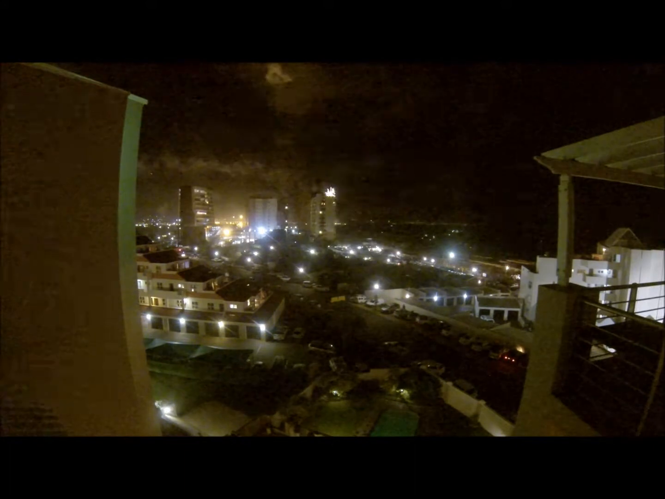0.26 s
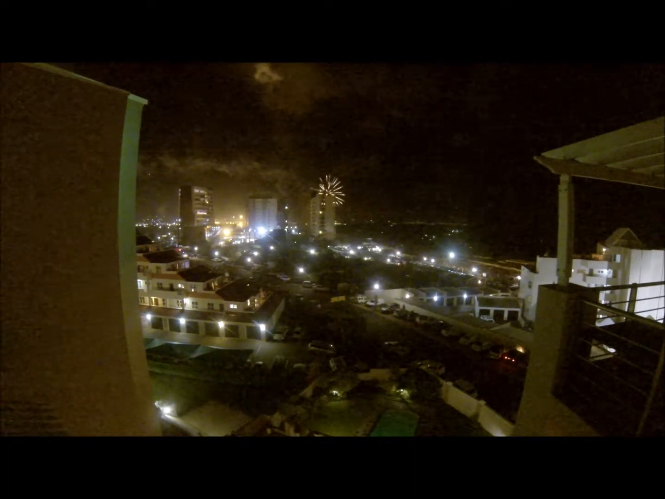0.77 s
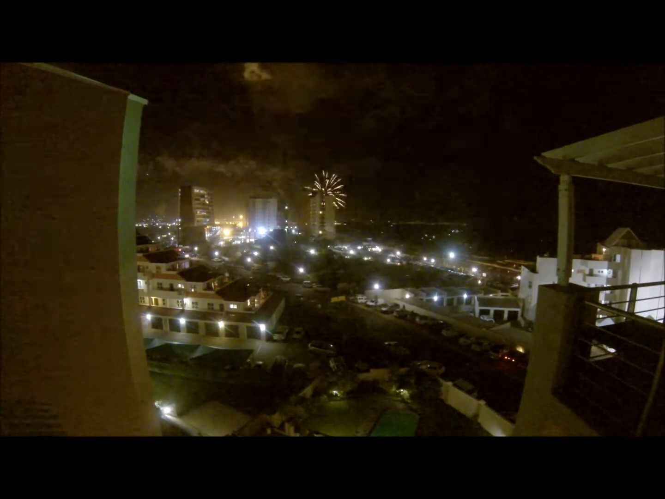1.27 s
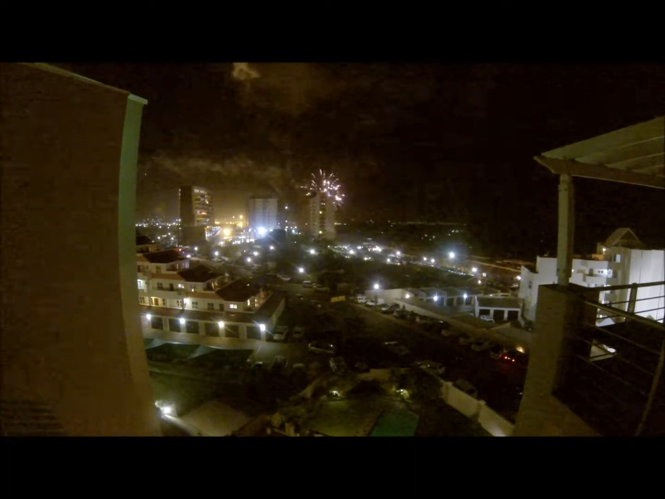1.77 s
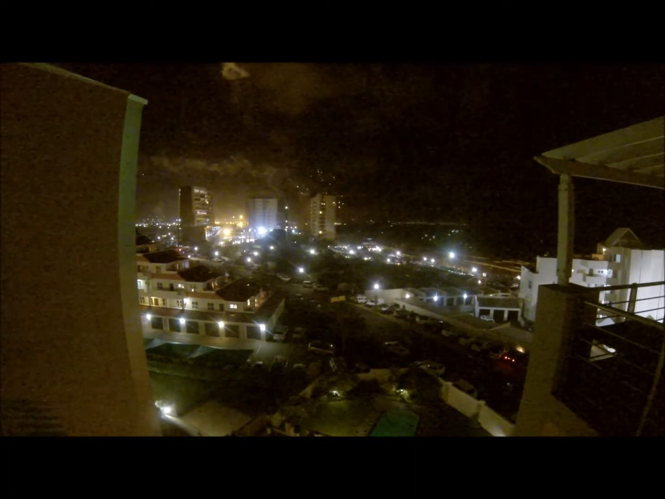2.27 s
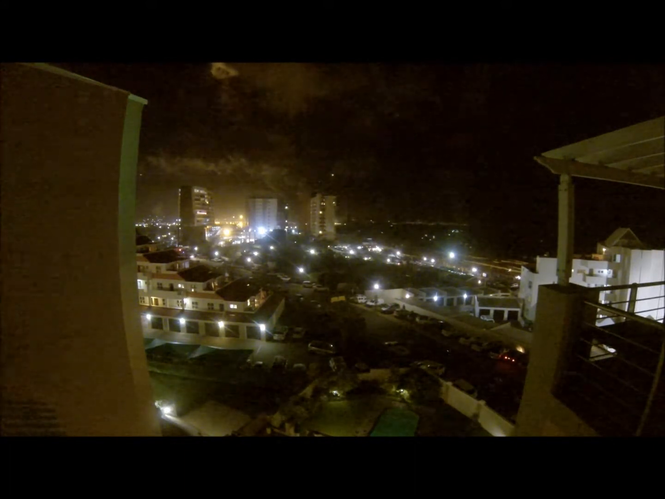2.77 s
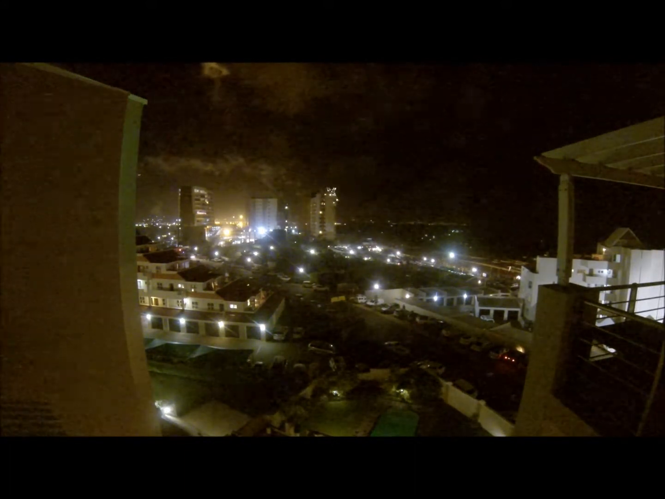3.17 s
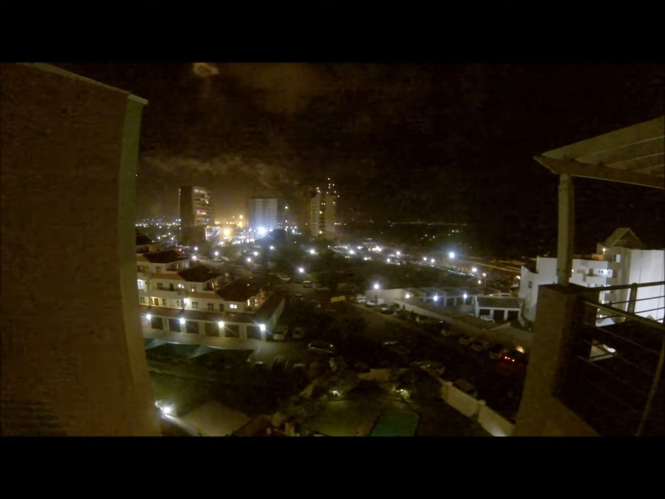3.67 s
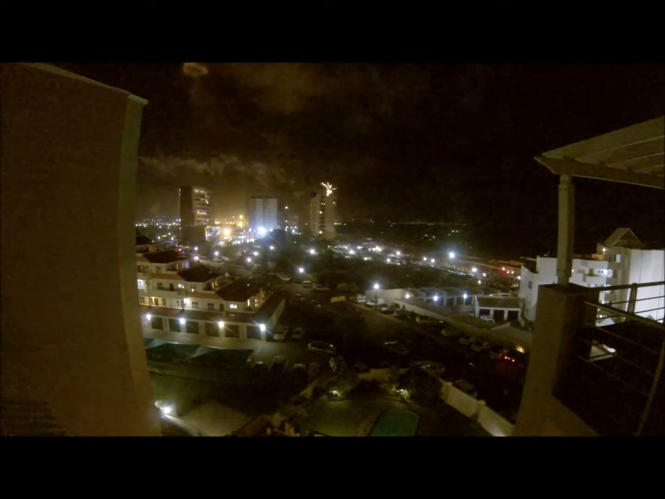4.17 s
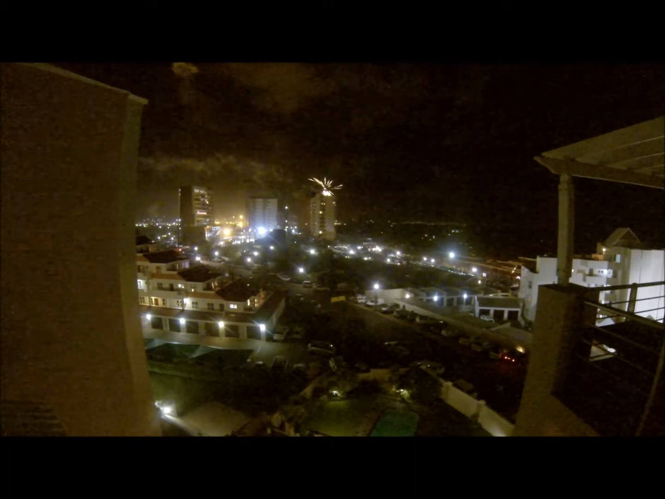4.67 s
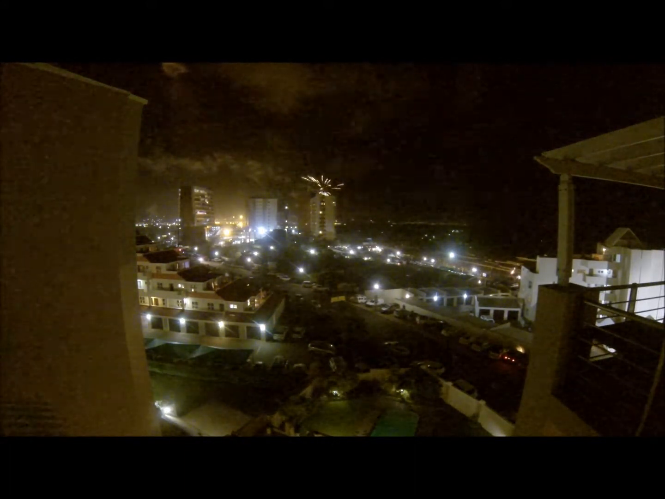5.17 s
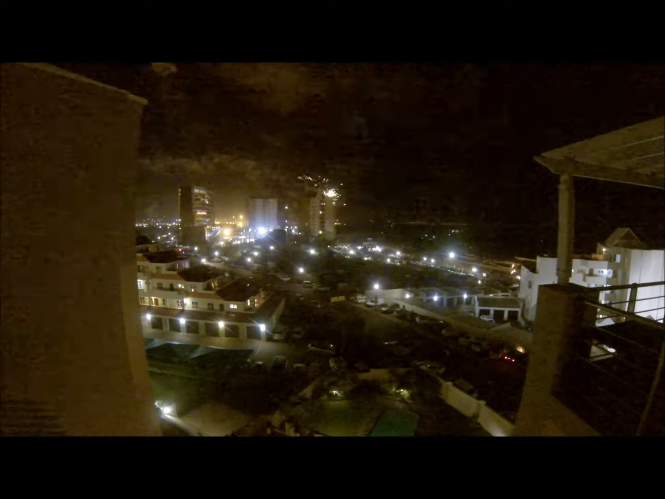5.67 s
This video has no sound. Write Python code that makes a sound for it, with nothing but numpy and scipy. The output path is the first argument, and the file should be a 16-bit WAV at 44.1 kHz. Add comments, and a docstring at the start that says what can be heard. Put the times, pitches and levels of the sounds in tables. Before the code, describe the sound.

The sound opens on a distant firework burst already dying away: low thuds in the first third of a second, an echo swell around 0.15 s, bass fading before the treble. A deep, unevenly throbbing rumble and muffled town rush run throughout, coloured by the hollow air of a high balcony. A faint pop at about 1.15 s precedes a strong sharp crack at 1.27 s; others follow at 2.4, 4.0 and 5.0 s, the last boomier and duller. Each crack scatters off the balcony walls, slaps back from a large building about 0.16 s later, then rolls over roofs with a soft late return. Another tiny pop comes near 1.9 s. Faint thin whistles slide mostly upward from 3.3 to 4.5 s and more clearly from 5.2 s to the end, around 1.1 and 1.8 kHz. The microphone sounds small and boxy, with faint hiss and whine.

```python
"""A shell burst dies away over a town at night, its bass sooner than its treble, with low thuds off the town.
A low rumble throbs beneath, over noise for the town's rush. Four more far fireworks crack from 1.27 s on:
sharp clicks and smeared noise off the walls of a high balcony, whose air rings in decaying modes. Each returns
from a large building and rolls over the roofs as fading noise. Far whistles, sliding tones, come between and
after the later ones. All passes through a small resonant case, with faint electronic hiss and whine on top."""
import sys
import numpy as np
from scipy import signal
from scipy.fft import rfft, irfft, next_fast_len
from scipy.io import wavfile
from scipy.ndimage import uniform_filter1d

SR = 44100
rng = np.random.default_rng(int(sys.argv[2]) if len(sys.argv) > 2 else 0)


def int16_out(signal):
    """Quantize to a 16-bit WAV file."""
    q = np.round(np.clip(np.atleast_2d(signal).T, -1, 1) * 32767)
    wavfile.write(sys.argv[1], SR, q.astype(np.int16))


N = 261513
T = np.arange(N) / SR

# Levels in the tables and settings are relative: later filters and gains still act on them.

# level of the deep rumble: (time [s], level [dB])
RUMBLE_LEVEL = [(0, -25), (.23, -35.5), (.41, -22.5), (.6, -30.5), (.8, -27.5), (1.2, -26), (1.43, -40),
                (1.5, -30), (1.78, -34), (1.88, -49.5), (2.02, -32.5), (2.21, -30), (2.36, -55),
                (2.43, -28.5), (2.67, -30), (2.79, -47), (2.88, -35), (2.94, -40.5), (3.01, -33.5),
                (3.21, -48), (3.39, -28), (3.54, -44.5), (3.62, -35.5), (3.72, -48), (3.85, -29),
                (3.93, -42), (4.11, -22.5), (4.3, -34.5), (4.53, -23.5), (4.76, -29.5), (5.08, -29),
                (5.2, -39.5), (5.33, -29.5), (5.6, -40), (5.93, -35.5)]
# levels of the town's low noise and of its rush: (time [s], low level [dB], rush level [dB])
TOWN_LEVEL = [(0, 8, 1), (.7, -1, 2), (1.15, 0.5, 5), (1.6, 2.5, -0.5), (2.05, -2, 1.5), (2.36, 0.5, -1.5),
              (2.9, 1, 1), (3.4, -2, 0.5), (3.85, -1.5, 0.5), (4.5, -0.5, 4), (4.87, -2, 0.5),
              (5.4, -0.5, 2.5), (5.93, 0.5, 4)]
# spectrum of the town's noise: (frequency [Hz], level [dB])
TOWN_SPECTRUM = [(20, -50.5), (60, -17.5), (95, -25), (125, -30.5), (200, -30.5), (280, -37.5),
                 (480, -42.5), (640, -50), (900, -57.5), (1700, -55.5), (2300, -64.5), (3000, -68.5),
                 (3550, -73), (6000, -90.5)]
# where the balcony lifts the town's noise: (frequency [Hz], width [Hz], gain [dB])
TOWN_RESONANCES = [(92.7, 12, 7.5), (153.9, 21.6, 16), (222, 20, 3)]
# soft swells in the balcony's air modes: (middle [s], length [s], frequency [Hz], level [dB])
SWELLS = [(0.374, 0.17, 93.8, -47), (.68, 0.11, 92, -41.5), (0.853, 0.11, 205, -44),
          (1.105, 0.23, 228, -44), (1.207, 0.12, 93, -40), (1.657, 0.1, 87.8, -51), (2, 0.14, 90, -45),
          (2.02, 0.19, 212, -51), (3.13, 0.88, 157.9, -50), (3.348, 0.2, 208, -54),
          (3.625, 0.23, 157.4, -46.5), (3.867, 0.087, 210, -45), (4.49, 0.13, 226, -48.5),
          (4.84, 0.14, 221, -44), (5.683, 0.87, 91.76, -46), (5.745, 0.2, 205, -49)]
# the deepest air mode sits a little higher when driven harder
RUMBLE_HZ, RUMBLE_HZ_PER_DB, RUMBLE_WANDER_HZ = 47.7, 0.19, 3
RUMBLE_WANDER_DB_PER_DB = 0.551  # the pitch wanders more as the rumble sinks
RUMBLE_DB, THROB_DB, THROBS_PER_S = -0.84, 1.27, 25
TOWN_SHARE = 0.51  # share of the rumble's swell that the town's low noise follows
SWELL_STEPS_PER_S = 22  # faster steps make a wider band

# far whistles; a negative slide falls: (start [s], length [s], held pitch [Hz], upward slide [Hz], level [dB])
WHISTLES = [(3.334, 0.28, 1120, 40.5, -74), (3.569, 0.19, 1150, 61, -70), (3.705, 0.15, 1110, 1.5, -70.5),
            (3.919, 0.15, 1125, 27, -67), (4.178, 0.17, 1102, -0.5, -64), (4.235, 0.25, 1793, -10, -69.5),
            (5.179, 0.22, 1128, 115, -62), (5.334, 0.21, 1120, 28.5, -62), (5.485, 0.27, 1153, 24.5, -64.5),
            (5.678, 0.33, 1144, 9.5, -66), (5.25, 0.14, 1800, -36, -65), (5.598, 0.18, 1880, 29.5, -68.5),
            (5.77, 0.096, 1830, -38, -61), (5.848, 0.14, 1805, -83, -64.5), (4.764, 0.32, 3490, 152.5, -83)]
WHISTLE_SLIDE_S, WHISTLE_ATTACK_S, WHISTLE_RELEASE_S = 0.11, 0.022, 0.11
WHISTLE_SCATTER, WHISTLE_SCATTER_STEPS_PER_S = 0.4, 45  # scattered copies, as a share of the tone
WHISTLE_WAVER, WHISTLE_FLUTTER_DB = .007, 1.6  # waver as a share of the pitch

# spectrum of the earlier shell: (frequency [Hz], level [dB])
EARLIER_SPECTRUM = [(30, -5), (90, -11.5), (165, -8), (240, -5), (340, -25.5), (490, -22), (750, -42),
                    (1100, -37.5), (1900, -40), (2700, -51), (3700, -59), (7000, -71), (12000, -89)]
# its low thuds: (time [s], frequency [Hz], level [dB], t60 [s])
THUDS = [(0, 168, 2.5, 0.028), (.029, 179, -6.5, 0.058), (0.065, 201, -14, .06), (.086, 148, -16.5, 0.18),
         (.166, 173, -14, 0.1), (.244, 164.5, -20, .2), (.32, 165.4, -25, 0.18)]
EARLIER_BASS_DB, EARLIER_BASS_T60_S = 0, 0.73
EARLIER_TREBLE_DB, EARLIER_TREBLE_T60_S = 1, 2.24
EARLIER_ROLL_DB, EARLIER_ROLL_T60_S = -15.5, 7.6
EARLIER_ECHO_S, EARLIER_ECHO_DB, EARLIER_ECHO_T60_S = 0.144, -2, 0.56

# shells: (arrival [s], boom [dB], crack [dB], treble edge [dB], rolling tail's treble [dB], echo's treble [dB])
BURSTS = [(1.269, 1.5, 4.5, 1, 4, -2), (2.4099, -0.5, 1.5, -2.5, 2, -5), (4.0080, 0, 1, 0, 0.5, -3),
          (5.0255, 2, -6, -15, 1, -10)]
# faint small pops: (time [s], level [dB], t60 [s])
POPS = [(1.159, -9, 0.28), (1.882, -11.5, 0.065)]
# spectrum of the rolling scatter: (frequency [Hz], level [dB])
ROLL_SPECTRUM = [(40, -22), (160, -18), (260, -17.5), (480, -20), (680, -34), (850, -41.5), (1100, -32.5),
                 (1400, -33.5), (2100, -40), (2700, -44.5), (3200, -53), (3650, -53.5), (5000, -67.5),
                 (9000, -84.5)]
# a soft, drawn-out return from the far side of town
FAR_LAG_S, FAR_RISE_S, FAR_T60_S, FAR_LOW_DB, FAR_HIGH_DB = 0.434, 0.091, 0.88, -21, -22.5

# facades that return each shock: (lag [s], depth in time [s], level [dB])
FACADES = [(0.042, .062, -2), (0.160, 0.0159, -1.5), (0.206, .02, -9)]
# low-mid thump of the largest facade's return: (frequency [Hz], level [dB], t60 [s])
THUMP = [(342, -41, 0.22), (302, -42, 0.072)]
# spectrum of the building's echo: (frequency [Hz], level [dB])
ECHO_SPECTRUM = [(60, -15.5), (200, -9), (350, -10.5), (500, -23), (760, -35), (1100, -24.5), (2000, -29),
                 (2900, -41), (4000, -47.5), (6000, -65.5), (12000, -102.5)]
THUMP_LAG_S = .163
SLAP_LAG_S, SLAP_DB, SLAP_LOSS_DB_PER_S = .163, 20, 301  # the hard knock off the flat front
WAKE_LAG_S, WAKE_DB, WAKE_T60_S = 0.1624, -10, 0.38

# paths by floor, walls and roof of the balcony: (delay [s], level [dB])
WALLS = [(.0002, -8.5), (.0036, -5.5), (.0079, -8.4), (0.0131, -5), (0.0254, -11.5), (.0444, -13)]
# air modes of the balcony: (frequency [Hz], level [dB], t60 [s])
BALCONY_MODES = [(45.8, -33.5, 0.87), (97.5, -34, 0.36), (157, -21.5, 0.21), (204, -31.5, 0.21),
                 (253.3, -31, 0.21), (520, -42, 0.025)]
# spectrum of the push on the balcony air: (frequency [Hz], level [dB])
PUSH_SPECTRUM = [(520, 0.5), (760, -14), (1500, -20)]
# spectrum of the crack: (frequency [Hz], level [dB])
CRACK_SPECTRUM = [(40, -19), (270, -5), (450, 0.5), (780, -17), (1200, 0), (1900, -9), (2700, -15.5),
                  (3200, -25.5), (3600, -22.5), (4300, -37), (6000, -45), (9000, -75)]
# the case's brief ping after a sharp front: (frequency [Hz], level [dB], t60 [s])
PING = [(3500, -62, 0.15), (3620, -61, .22)]
WALL_TREBLE_LOSS_DB_PER_S = 858
SNAP_LAG_S, SNAP_DB, SNAP_T60_S = 0.0024, 5.5, 0.024  # the hardest part of the crack

# resonances and dips of the case: (frequency [Hz], width [Hz], gain [dB])
CASE = [(1074.5, 130, 8), (1283, 99, 3), (1370, 77, -6.5), (1615, 310, 6), (2406, 130, 5), (3250, 350, -3),
        (3477, 210, 8), (3900, 300, -1.5), (5800, 130, 3.5)]
# spectrum of the electronic hiss: (frequency [Hz], level [dB])
HISS_SPECTRUM = [(1000, -58), (3500, -64.5), (5500, -69), (9000, -72.5), (10700, -78.5), (11700, -71.5),
                 (13600, -76.5), (14200, -84.5)]
WHINE_HZ, WHINE_DB, TOP_HZ = 13635, -90, 14500
SING_HZ, SING_STEPS_PER_S, SING_DB = 5620, 67, -89.5  # a faint narrow band in the hiss


def undb(db):
    """Decibels to gain."""
    return 10 ** (np.asarray(db) / 20)


def curves(table):
    """The columns of a table, joined by straight lines in time."""
    s, *columns = np.transpose(table)
    return [np.interp(T, s, c) for c in columns]


def noise():
    """White noise of unit power."""
    return rng.standard_normal(N)


def shape(x, db_at):
    """Causal minimum-phase filter whose gain in dB is the function db_at of frequency."""
    size = 2 * next_fast_len(N)
    log_gain = np.log(undb(db_at(np.fft.rfftfreq(size, 1 / SR))))
    # folding the cepstrum onto positive time makes the filter causal
    cepstrum = irfft(log_gain)
    cepstrum[1:size // 2] *= 2
    cepstrum[size // 2 + 1:] = 0
    response = np.exp(rfft(cepstrum))
    return irfft(rfft(x, size) * response)[:N]


def colour(x, spectrum):
    """Filter by spectrum points, joined along log frequency."""
    hz, db = np.transpose(spectrum)
    return shape(x, lambda f: np.interp(np.log(f + 1), np.log(hz), db))


def resonate(x, peaks):
    """Filter by bell-shaped resonances and dips, summed in dB."""
    return shape(x, lambda f: sum(db / (1 + (2 * (f - hz) / width) ** 2) for hz, width, db in peaks))


def tilt(x, low_db, high_db, split_hz=750):
    """Separate gains below and above the split."""
    low = signal.sosfiltfilt(signal.butter(2, split_hz, fs=SR, output="sos"), x)
    return low * undb(low_db) + (x - low) * undb(high_db)


def walk(rate):
    """Random levels, a new one every 1 / rate s, slewed in straight lines; spread a little under 1."""
    k = max(int(SR / rate), 1)
    steps = np.repeat(rng.standard_normal(N // k + 1), k)[:N]
    return uniform_filter1d(steps, k)


def narrow(hz, steps_per_s):
    """Noise in a narrow band about a pitch: a carrier whose two phases drift at random."""
    phase = 2 * np.pi * np.cumsum(hz + np.zeros(N)) / SR
    # the factor makes up for the power that slewing takes
    return np.sqrt(3 / 2) * (walk(steps_per_s) * np.cos(phase) + walk(steps_per_s) * np.sin(phase))


def fade(start, t60, rise):
    """Envelope that rises from the start with time constant rise and dies 60 dB in t60."""
    age = np.maximum(T - start, 0)
    return (1 - np.exp(-age / rise)) * np.exp(-np.log(1000) * age / t60)


def smear(envelope):
    """A unit click spread over many random paths under the envelope, its spectrum still nearly flat."""
    paths = rfft(noise() * envelope, 2 * next_fast_len(N))
    # keep only the phases, so the envelope gives the spread and not the level
    flat = irfft(np.exp(1j * np.angle(paths)))[:N]
    return flat * (envelope > 0)


def clicks(s, loss_db_per_s):
    """One click for each path by the balcony walls; the longer paths lose more where a loss is set."""
    out = np.zeros(N)
    for delay, db in WALLS:
        out[int((s + delay) * SR)] += undb(db - loss_db_per_s * delay)
    return out


def ringing(s, modes, rise=0.0056):
    """Damped modes set going at time s."""
    return sum(undb(db) * fade(s, t60, rise) * np.cos(2 * np.pi * hz * (T - s)) for hz, db, t60 in modes)


def swell(s, length, hz, db):
    """Far low noise rises and sinks in one air mode."""
    return narrow(hz, SWELL_STEPS_PER_S) * undb(db) * np.exp(-2 * ((T - s) / length) ** 2)


def town(swell_db):
    """The town's low noise and rush, lifted by the balcony's air modes."""
    rush = colour(noise() * undb(1.1 * walk(14)), TOWN_SPECTRUM)
    rush = resonate(rush, TOWN_RESONANCES)
    # the higher air modes swell along with the deepest
    rush = tilt(rush, TOWN_SHARE * swell_db, 0, split_hz=366)
    low_db, rush_db = curves(TOWN_LEVEL)
    return tilt(rush, low_db, rush_db) + sum(swell(*row) for row in SWELLS)


def rumble():
    """Far low noise in the balcony's deepest mode, as a wandering tone that throbs at random, over the town."""
    db = curves(RUMBLE_LEVEL)[0] + THROB_DB * walk(THROBS_PER_S)
    swell_db = db - np.mean(db)
    wander_hz = RUMBLE_WANDER_HZ * undb(-RUMBLE_WANDER_DB_PER_DB * swell_db) * walk(20)
    hz = RUMBLE_HZ + RUMBLE_HZ_PER_DB * swell_db + wander_hz
    throb = np.sqrt(2) * undb(db + RUMBLE_DB) * np.sin(2 * np.pi * np.cumsum(hz) / SR)
    return throb + town(swell_db)


def whistle(s, length, held_hz, slide_hz, db):
    """A thin far tone slides to its pitch; moving air and scattered copies make it pulse unevenly."""
    age = np.maximum(T - s, 0)
    hz = held_hz - slide_hz * np.exp(-age / WHISTLE_SLIDE_S)
    envelope = np.clip(np.minimum(age / WHISTLE_ATTACK_S, (length - age) / WHISTLE_RELEASE_S), 0, 1)
    tone = np.sin(2 * np.pi * np.cumsum(hz * (1 + WHISTLE_WAVER * walk(70))) / SR)
    scatter = WHISTLE_SCATTER * narrow(hz, WHISTLE_SCATTER_STEPS_PER_S)
    return (tone + scatter) * envelope * undb(db + WHISTLE_FLUTTER_DB * walk(30))


def thuds():
    """The earlier shell comes back off the town in separate low thuds, each one damped mode."""
    return sum(ringing(s, [mode]) for s, *mode in THUDS)


def earlier_burst():
    """A shell that has already gone off: noise that fades, swells once with its echo, and rolls away."""
    echo = undb(EARLIER_ECHO_DB) * fade(EARLIER_ECHO_S, EARLIER_ECHO_T60_S, rise=0.0038)
    after = np.hypot(echo, undb(EARLIER_ROLL_DB - 60 * T / EARLIER_ROLL_T60_S))
    # the bass dies faster than the treble, both over the long roll
    bass = np.hypot(undb(EARLIER_BASS_DB - 60 * T / EARLIER_BASS_T60_S), after)
    treble = np.hypot(undb(EARLIER_TREBLE_DB - 60 * T / EARLIER_TREBLE_T60_S), after)
    bass_db = 20 * np.log10(bass) + 2 * walk(40)
    treble_db = 20 * np.log10(treble) + 1.3 * walk(160)
    return colour(tilt(noise(), bass_db, treble_db), EARLIER_SPECTRUM)


def roofs(s, boom_db, roll_db):
    """Scatter from near roofs, lumpy wall by wall, then a long faint roll and a late return from far ones."""
    low = tilt(noise(), boom_db, -56) * fade(s, t60=0.6, rise=0.037)
    high = tilt(noise(), -60, roll_db) * fade(s, t60=.5, rise=.003)
    far = tilt(noise(), boom_db - 16.5, roll_db - 13.0) * fade(s, t60=2.5, rise=0.023)
    late = tilt(noise(), FAR_LOW_DB, FAR_HIGH_DB) * fade(s + FAR_LAG_S, FAR_T60_S, FAR_RISE_S)
    return (low + high) * undb(0.78 * walk(220)) + far + late


def small_pops():
    """Small pops arrive only as scatter: short fading noise."""
    pops = sum(undb(db) * noise() * fade(s, t60, rise=0.0025) for s, db, t60 in POPS)
    return tilt(pops, -0.5, 0)


def building(s, echo_db):
    """A large flat front slaps back, wide facades draw the shock out, and blocks behind add a duller wake."""
    facades = undb(SLAP_DB) * clicks(s + SLAP_LAG_S, SLAP_LOSS_DB_PER_S)
    for lag, depth, db in FACADES:
        age = T - s - lag
        spread = np.sqrt(np.maximum(age * (depth - age), 0))
        facades = facades + undb(18.0 + db) * smear(spread)
    wake = undb(WAKE_DB) * fade(s + WAKE_LAG_S, WAKE_T60_S, rise=0.0034)
    return tilt(facades, -1, echo_db) + tilt(noise(), 1.5, -5.5) * wake


def booms():
    """Each shock pushes the balcony air by every wall path, and its close modes ring and beat."""
    pushes = sum(undb(boom_db) * clicks(s, 0) for s, boom_db, *_ in BURSTS)
    air = signal.fftconvolve(pushes, ringing(0, BALCONY_MODES, rise=0.0001))[:N]
    return colour(air, PUSH_SPECTRUM)


def shock(s, boom_db, crack_db, edge_db):
    """The front cracks off the walls and pings the case; its hardest snap comes just after the first edge."""
    # railings and turbulent air fray the treble of the front
    snap = undb(SNAP_DB) * fade(s + SNAP_LAG_S, SNAP_T60_S, rise=0.00034)
    fray = fade(s, t60=0.075, rise=0.00022) + snap
    fronts = undb(2.5) * clicks(s, WALL_TREBLE_LOSS_DB_PER_S) + tilt(smear(fray), -3.0, 5.5)
    # a steeper front carries more treble
    crack = colour(fronts, CRACK_SPECTRUM)
    crack = shape(crack, lambda f: np.interp(f, [400, 1100, 3000], [boom_db, crack_db, edge_db]))
    return crack + undb(edge_db) * ringing(s, PING)


def bursts():
    """Every shell: the shock, scatter from near and far roofs, and one broad echo off a building."""
    direct, roll, echo = 0, 0, 0
    for s, boom_db, crack_db, edge_db, roll_db, echo_db in BURSTS:
        direct = direct + shock(s, boom_db, crack_db, edge_db) + ringing(s + THUMP_LAG_S, THUMP)
        roll = roll + roofs(s, boom_db, roll_db)
        echo = echo + building(s, echo_db)
    return direct + colour(roll + small_pops(), ROLL_SPECTRUM) + colour(echo, ECHO_SPECTRUM)


def scene():
    """All that reaches the balcony, from the background to the shells."""
    background = rumble() + sum(whistle(*row) for row in WHISTLES)
    earlier = thuds() + earlier_burst()
    return (background + earlier + booms() + bursts())[None]


def record(dry):
    """The case resonates; the electronics add hiss and a thin whine; a steep low-pass cuts the top."""
    whine = undb(WHINE_DB) * np.sin(2 * np.pi * np.cumsum(WHINE_HZ + 12 * walk(40)) / SR)
    hiss = colour(noise(), HISS_SPECTRUM) + undb(SING_DB) * narrow(SING_HZ, SING_STEPS_PER_S)
    out = resonate(dry[0], CASE) + hiss + whine
    return signal.sosfilt(signal.ellip(8, .2, 70, TOP_HZ, fs=SR, output="sos"), out)[None]


dry = scene()
out = record(dry)
int16_out(out)
```